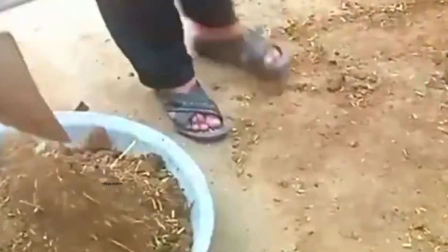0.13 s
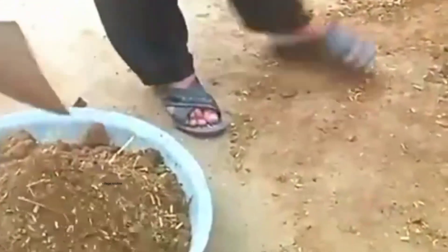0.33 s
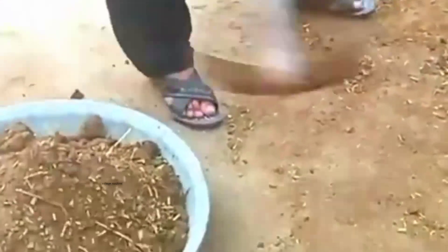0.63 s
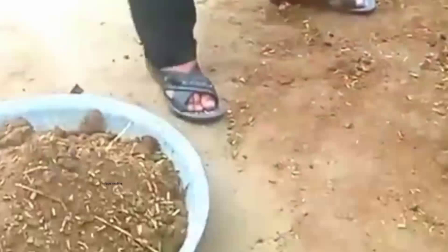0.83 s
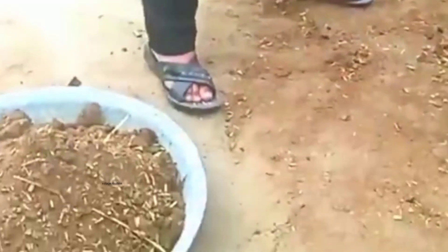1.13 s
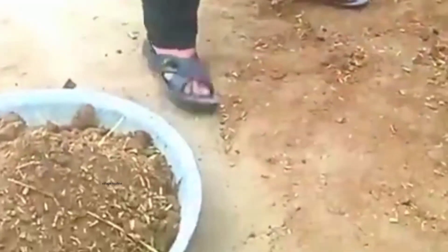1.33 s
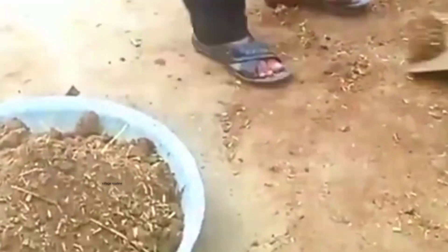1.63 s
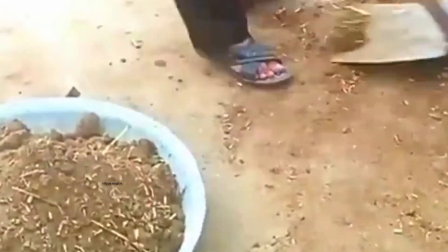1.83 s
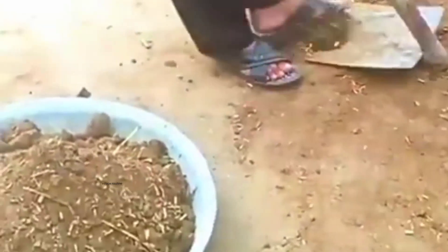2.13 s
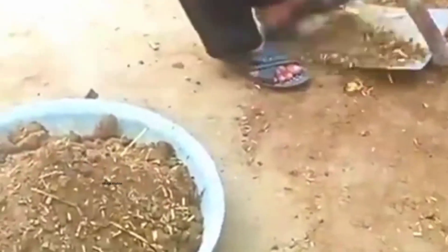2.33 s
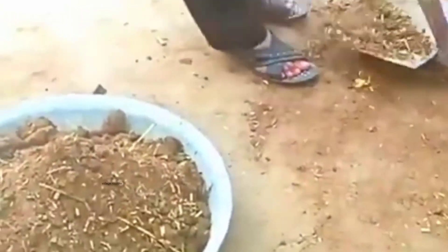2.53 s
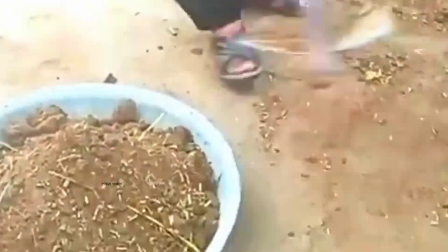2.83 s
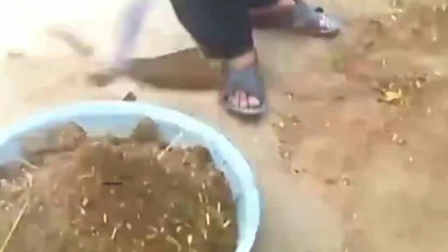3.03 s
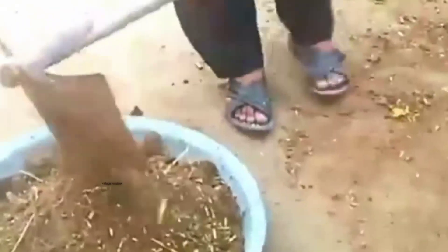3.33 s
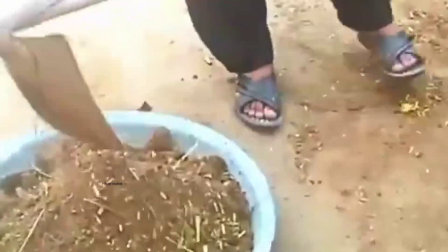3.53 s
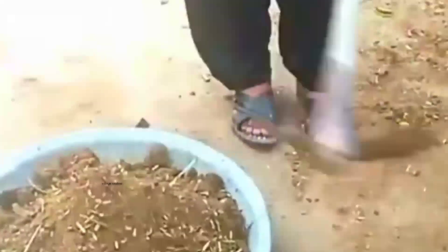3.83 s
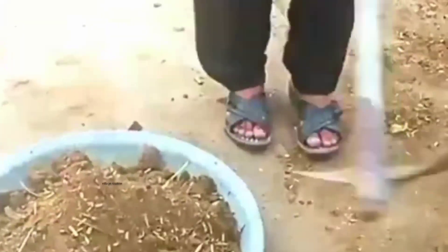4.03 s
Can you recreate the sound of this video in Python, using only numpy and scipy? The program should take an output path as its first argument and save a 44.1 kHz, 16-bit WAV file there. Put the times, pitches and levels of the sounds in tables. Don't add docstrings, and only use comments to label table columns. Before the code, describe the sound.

Two sparrows trade falling chirps in an open shed while wind thumps softly, bristles whisper over dirt, and one brief gritty pour knocks late.

```python
import sys
import numpy as np
from scipy import signal
from scipy.fft import rfft, irfft, next_fast_len
from scipy.io import wavfile
from scipy.ndimage import uniform_filter1d, map_coordinates

SR = 44100
rng = np.random.default_rng(int(sys.argv[2]) if len(sys.argv) > 2 else 0)


def level_to_linear(level):
    exponent = np.asarray(level, float) / 20
    return 10 ** exponent


def transcribe(signal):
    frames = np.atleast_2d(signal).T
    limited = np.clip(frames, -1, 1)
    pcm = np.round(limited * 32767).astype(np.int16)
    wavfile.write(sys.argv[1], SR, pcm)


N = 184229

# (time [s], level [dB])
YARD_LEVEL = [(0.0, -50.5), (0.36, -47), (0.58, -50), (1.8, -48), (1.99, -50), (2.27, -50), (2.44, -47.5),
              (2.85, -50), (3.13, -47.5), (3.33, -53.5), (3.88, -51), (4.08, -48), (4.18, -49)]
# (frequency [Hz], density [dB per Hz])
YARD_SPECTRUM = [(20, -56.5), (40, -31.5), (64, -17.5), (110, -10), (300, -6.5), (480, -13), (674, -11),
                 (1280, -10), (2070, -12.5), (3300, -19), (7020, -27), (8300, -34), (10100, -51.5),
                 (15500, -46.5)]
# (time [s], level [dB])
BREEZE_LEVEL = [(0, -52), (.33, -47), (.6, -51), (1.22, -56), (1.35, -44.5), (1.95, -50.5), (2.5, -44.5),
                (2.75, -50.5), (3.5, -55.5), (3.83, -54), (3.9, -43.5), (4.18, -54.5)]
# (time [s], peak level [dB])
PUFFS = [(.18, -46), (.235, -38), (.37, -39.5), (.67, -43), (.75, -57.5), (0.929, -41), (1.124, -38),
         (1.3, -38), (1.45, -47.5), (1.52, -40), (1.58, -50), (1.762, -36.5), (1.831, -39), (1.89, -40),
         (2.25, -40.5), (2.44, -47), (2.569, -50.5), (2.64, -47.5), (3.65, -45), (3.7, -51.5)]
# (frequency [Hz], density [dB per Hz])
BUFFET_SPECTRUM = [(60, -36), (110, -14), (173, 0), (205, -6), (237, 3), (325, -4.5), (389, -23),
                   (500, -38), (900, -120)]
# (time of peak [s], peak level [dB], rise [dB/s], fade [dB/s])
STROKES = [(.26, -68.5, 300, 130.5), (.855, -73.5, 193, 133), (.96, -72.5, 200, 65.5),
           (1.55, -70.5, 200.5, 79), (1.71, -73, 170, 120), (1.94, -79, 55, 200), (2.3, -68, 227.5, 129.5),
           (2.49, -69.5, 183, 126), (3.008, -68, 1200, 59.5), (3.12, -66.5, 104.5, 139),
           (3.38, -74, 219.5, 89), (3.9, -71.5, 214.5, 190)]
# (frequency [Hz], density [dB per Hz])
BRISTLE_SPECTRUM = [(1500, -27.5), (4000, -7.5), (7200, 1), (8500, -17.5), (9800, -27), (11300, -24.5),
                    (12600, -31), (14000, -28), (15200, -22.5), (16000, -54)]
# (frequency [Hz], density [dB per Hz])
DIRT_SPECTRUM = [(240, -46), (450, -20), (750, -1.5), (1200, -14), (1800, -2.5), (3060, -5.5), (6990, -18),
                 (9790, -50.5), (15500, -48)]
# (time [s], peak level [dB], pitch [Hz])
CLODS = [
    (1.119, -43.5, 977),
    (3.003, -41, 789),
    (3.055, -22.5, 1915),
]
# (frequency [Hz], time to fall 60 dB [s])
SHED_DECAY = [(2500, 0.85), (4500, 0.612), (7500, 0.458), (15000, 0.714)]
# (multiple of the pitch, level [dB])
OVERTONES = [(2, -73), (3, -66.5)]
# (delay [s], first [Hz], middle [Hz], last pitch [Hz], level [dB])
SLUR = [
    (-.032, 5179, 5758, 5341, -9.5),
    (0, 4358, 4906, 4660, -1.5),
    (.019, 4750, 4300, 3910, -3),
    (.042, 4250, 3655, 3199, -1.5),
    (.069, 3348, 2935, 2848, -3.5),
]
# (time [s], level [dB], pace, fade [dB/s], hold of the middle step [0-1])
CHIRPS = [(.232, -31.5, 1.12, -29, 0.04), (.951, -36.5, 0.759, -69, 0), (1.52, -33.5, 1.124, -26, 0.27),
          (2.275, -31.5, 1.014, -38.5, 0), (3.087, -33.5, 0.875, -11, 0.58), (3.855, -36.5, .92, 52.5, 0.9)]
# (delay [s], first [Hz], middle [Hz], last pitch [Hz], level [dB])
CALL = [
    (-.022, 6095, 7392, 6910, -10.5),
    (0, 5395, 5400, 5304, -5),
    (.025, 4750, 4400, 3800, -1.5),
    (.027, 7260, 6806, 6470, -9),
]
# (delay [s], first [Hz], middle [Hz], last pitch [Hz], level [dB])
REPLY = [
    (-.045, 4864, 4514, 4374, -1.5),
    (0, 4804, 4265, 3847, 3),
    (.04, 3930, 3740, 3740, 2.5),
]
# (time [s], level [dB], pace, fade [dB/s], hold of the middle step [0-1])
CALLS_AT = [(0.827, -43.5, 0.767, 0.5, 0), (1.685, -41.5, 1.053, -1.5, 0), (2.485, -43, 1.4, -0.5, 0),
            (3.362, -45, 0.91, -79, 0.001)]
# (time [s], level [dB], pace, fade [dB/s], hold of the middle step [0-1])
REPLIES_AT = [(1.08, -51, 1.1, -0.5, 0.014), (1.858, -49.5, 1.14, -40, 0.0084), (3.501, -55.5, 0.94, -3, 0)]
# (time [s], pitch [Hz], fall [share of pitch], level [dB])
PEEPS = [(.14, 4430, 0.028, -54.5), (0.208, 4520, -0.1987, -41.5), (.21, 6540, 0.031, -50.5),
         (.936, 3973, -0.028, -43.5), (.95, 4597, 0.0322, -37), (.98, 6730, 0.0044, -49),
         (1.501, 7414, 0.037, -53), (1.76, 4800, .14, -55), (2.263, 6827, -0.0305, -44),
         (2.41, 3790, 0.11, -38.5), (3.844, 6287, -0.014, -50.5), (3.885, 6862, -0.027, -46.5)]
# (time [s], half width [s], gain [dB])
DUCKS = [(.8, 0.0153, 1), (2.02, 0.023, -1.5), (2.23, 0.026, -0.5), (3.32, 0.015, -1.5), (3.8, 0.043, -1.5)]

PUFF_S = 0.01865
STROKE_REST_DB = -88.5
POUR_S, POUR_DB = 2.999, -44.5
POUR_FIRST_DB, POUR_BUILDS_S = -5, 0.0474
POUR_THINS_DB_PER_S = 19.5
POUR_ENDS_S, POUR_STOPS_DB_PER_S = 3.253, 169.5
NOTE_S = 0.02743
HELD_HZ, HELD_DB, HELD_GLIDE = 4443, 9.5, 0.189
BURR_PER_GLIDE, BURR_PER_DRAWL_HZ, CLEAR_PACE = 0.246, 700, 0.839


def unit(x):
    return x / np.sqrt(np.mean(x ** 2) + 1e-20)


def along(points, hz):
    f, v = np.transpose(points)
    return np.interp(np.log(hz + 1), np.log(f + 1), v)


def curve(rows):
    s, db = np.transpose(rows)
    return level_to_linear(np.interp(np.arange(N) / SR, s, db, left=-120, right=-120))


def wobble(rate):
    knots = rng.standard_normal(int(N * rate / SR) + 4)
    return map_coordinates(knots, [np.arange(N) * rate / SR])


def coloured(x, spectrum, band):
    m = next_fast_len(N + 8192)
    hz = np.fft.rfftfreq(m, 1 / SR)
    z = rfft(x, m) * level_to_linear(along(spectrum, hz))
    inside = irfft(z * (hz > band[0]) * (hz < band[1]), m)[:N]
    return irfft(z, m)[:N] / np.std(inside)


def gritty(grit_db, patchy_db):
    grain_size = np.minimum(rng.exponential(size=N), 4)
    raw = rng.standard_normal(N) * level_to_linear(grit_db * grain_size)
    z = signal.stft(raw, nperseg=512)[2]
    field = uniform_filter1d(rng.standard_normal(z.shape), 3, 0)
    field = uniform_filter1d(field, 10, 1)
    return signal.istft(z * level_to_linear(patchy_db * unit(field)), nperseg=512)[1][:N]


def yard():
    drift = level_to_linear(.4 * wobble(7))
    return curve(YARD_LEVEL) * drift * coloured(gritty(0, 1.684), YARD_SPECTRUM, (500, 2400))


def wind():
    t = np.arange(N) / SR
    lumps = level_to_linear(0.48 * wobble(16) + 2.12 * wobble(35))
    push = curve(BREEZE_LEVEL)
    for s, db in PUFFS:
        push += level_to_linear(db - 4.5) * np.exp(-((t - s) / PUFF_S) ** 2)
    return level_to_linear(-3.0) * push * coloured(lumps * gritty(0, 1.36), BUFFET_SPECTRUM, (110, 380))


def swells(rows, rest_db):
    t = np.arange(N) / SR
    level = np.full(N, rest_db)
    for s, db, rise, fade in rows:
        below_peak = np.maximum(rise * (s - t), fade * (t - s))
        level = np.maximum(level, db - below_peak)
    return level_to_linear(level)


def broom():
    grit = coloured(gritty(2.58, 3.02), BRISTLE_SPECTRUM, (9500, 15400))
    return swells(STROKES, STROKE_REST_DB) * grit


def pan():
    now = np.arange(N) / SR
    since = now - POUR_S
    flow_db = POUR_DB + POUR_FIRST_DB * np.maximum(1 - since / POUR_BUILDS_S, 0)
    flow_db -= POUR_THINS_DB_PER_S * since
    flow_db -= POUR_STOPS_DB_PER_S * np.maximum(now - POUR_ENDS_S, 0)
    flow = (since > 0) * level_to_linear(flow_db)
    grains = coloured(gritty(3.48, 2.9), DIRT_SPECTRUM, (600, 2400))
    sliding = flow * level_to_linear(0.87 * wobble(40)) * grains
    t = np.arange(SR // 50) / SR
    for s, db, hz in CLODS:
        knock = level_to_linear(db - 60 * t / 0.00397) * np.sin(2 * np.pi * hz * t)
        sliding[round(s * SR):][:len(t)] += knock
    return sliding


def shed_tail():
    hz, t, z = signal.stft(rng.standard_normal(SR // 2), SR, nperseg=256)
    near_walls = level_to_linear(-11 - 60 * t / 0.047)
    late = level_to_linear(-60 * t / along(SHED_DECAY, hz)[:, None] - 6.7 * (t / 0.17) ** 2)
    tail = signal.istft(z * (late + near_walls), SR, nperseg=256)[1]
    return tail / np.linalg.norm(tail)


def phrases(shape, rows):
    notes = []
    for s, level, pace, fade, hold in rows:
        hold = np.clip(hold, 0, 1)
        drawl_hz = BURR_PER_DRAWL_HZ * max(pace - CLEAR_PACE, 0)
        for k, (delay, first, middle, last, db) in enumerate(shape):
            held = hold * (k == len(shape) // 2)
            flattened = max(held, hold * (k == len(shape) - 1))
            glide = 1 - flattened * (1 - HELD_GLIDE)
            centre = middle + held * (HELD_HZ - middle)
            start = s + pace * max(delay, 0) + min(delay, 0)
            begin, end = centre + glide * (first - middle), centre + glide * (last - middle)
            note_db = level + db + fade * abs(delay) + held * HELD_DB
            notes.append((start, NOTE_S * np.sqrt(pace), begin, centre, end, note_db, drawl_hz * (delay >= 0)))
    return notes


def sparrow(notes, direct):
    out = np.zeros(N + SR)
    flutter = np.sin(2 * np.pi * np.cumsum(260 + 70 * wobble(60)) / SR)
    rasp = .38 * wobble(2400)
    for s, length, first, middle, last, db, hoarse_hz in notes:
        start = round(s * SR)
        u = np.linspace(0, 1, max(round(length * SR), 64))
        bend = first * (1 - u) * (1 - 2 * u) + 4 * middle * u * (1 - u) + last * u * (2 * u - 1)
        burr_hz = hoarse_hz + BURR_PER_GLIDE * (abs(middle - first) + abs(last - middle))
        phase = 2 * np.pi * np.cumsum(bend + burr_hz * flutter[start:][:len(u)]) / SR
        whistle = np.sin(phase)
        for k, level in OVERTONES:
            if k * middle < SR / 3:
                whistle += level_to_linear(level) * np.sin(k * phase)
        whistle *= 1 + rasp[start:][:len(u)]
        swell = np.sin(np.pi * u ** .45) ** .7
        path = shed_tail()
        path[0] += direct
        heard = signal.fftconvolve(level_to_linear(db + 6.0) * swell * whistle, path)
        out[start:][:len(heard)] += heard
    return out[:N]


def scene():
    peeps = [(s, NOTE_S, hz * (1 + fall), hz, hz * (1 - fall), db, 110) for s, hz, fall, db in PEEPS]
    far_notes = phrases(CALL, CALLS_AT) + phrases(REPLY, REPLIES_AT) + peeps
    ground = yard() + wind() + broom() + pan()
    birds = sparrow(far_notes, direct=.12) + sparrow(phrases(SLUR, CHIRPS), direct=.25)
    return np.tile(ground + birds, (2, 1))


def top_cut(x):
    return signal.sosfilt(signal.butter(12, 15650, fs=SR, output="sos"), x)


def record(dry):
    t = np.arange(N) / SR
    duck_db = sum(db * np.exp(-((t - s) / width) ** 2) for s, width, db in DUCKS)
    return top_cut(dry * level_to_linear(duck_db))


dry = scene()
out = record(dry)
transcribe(out)
```